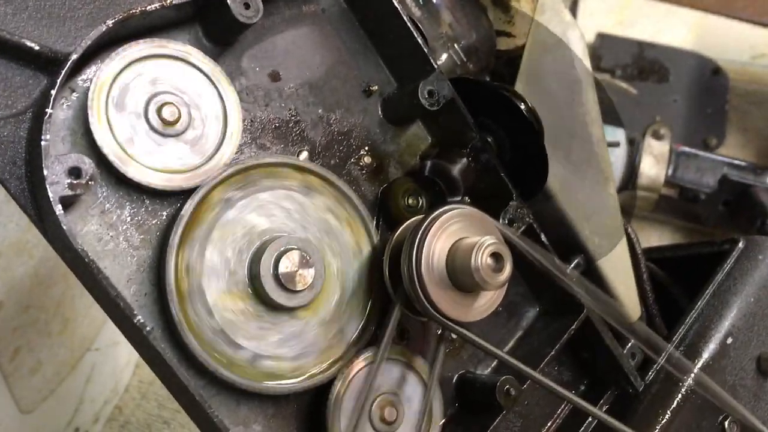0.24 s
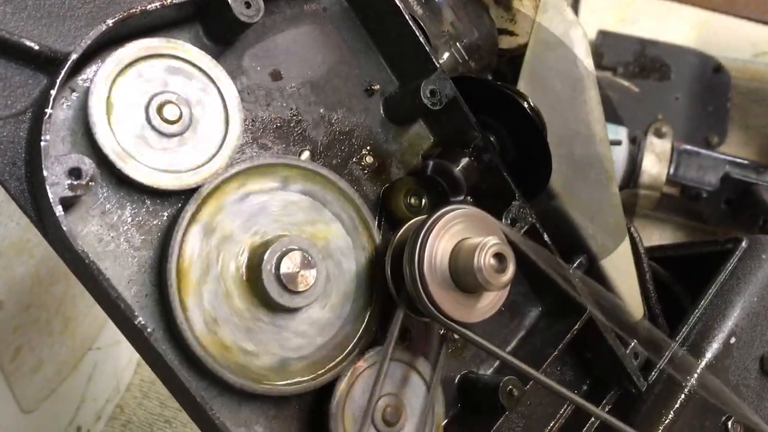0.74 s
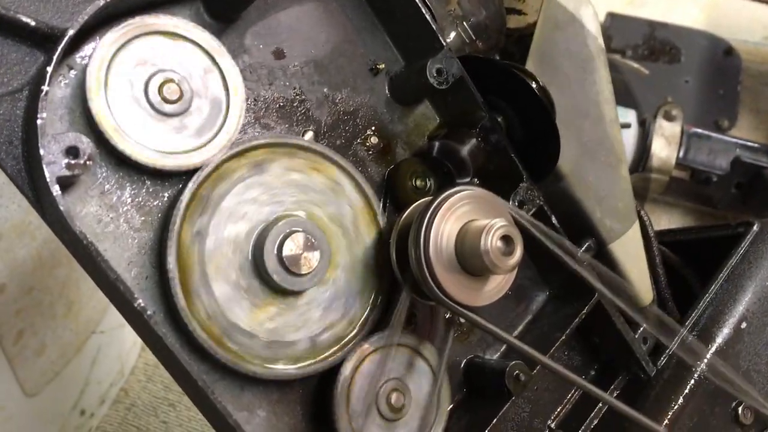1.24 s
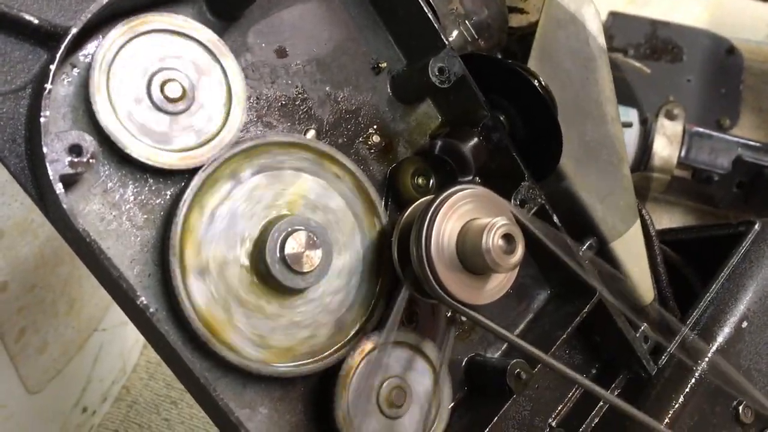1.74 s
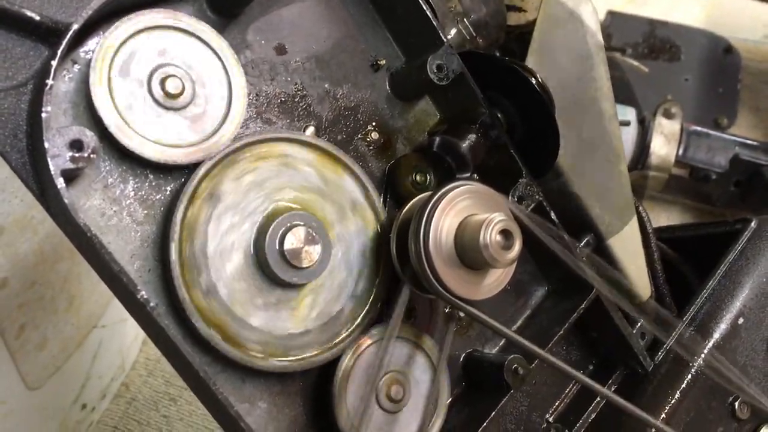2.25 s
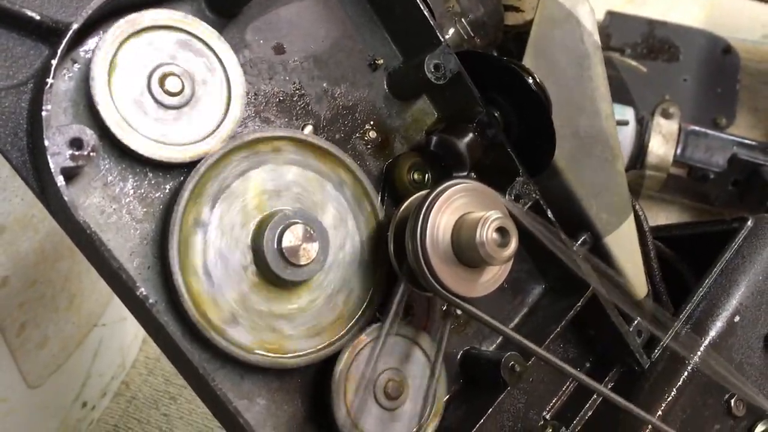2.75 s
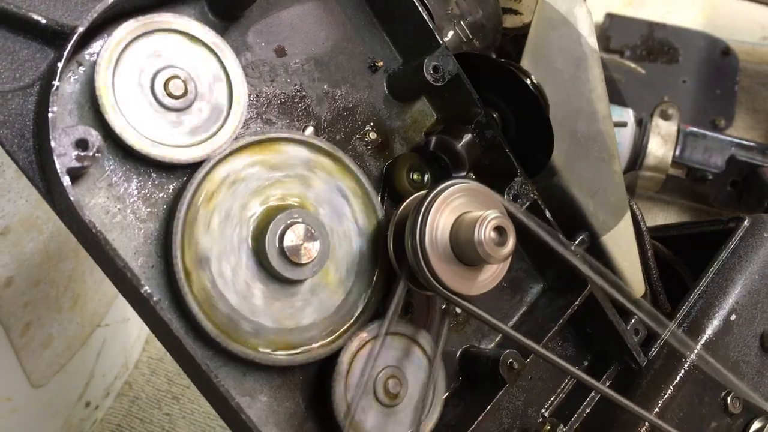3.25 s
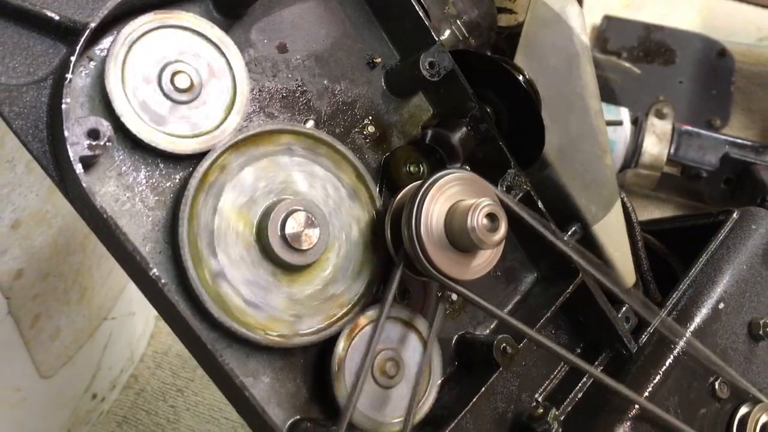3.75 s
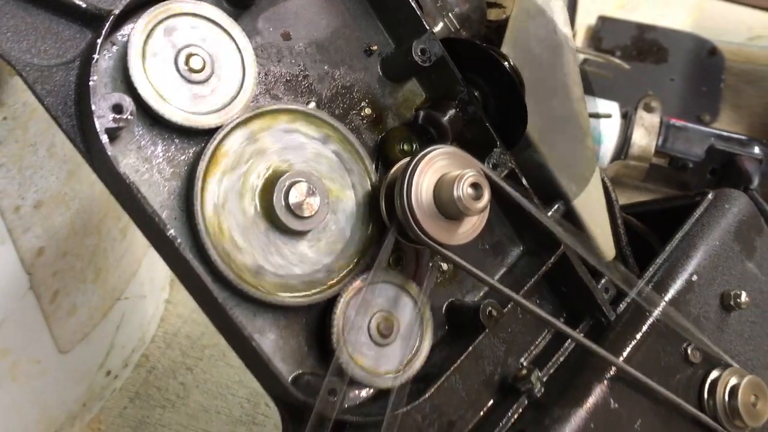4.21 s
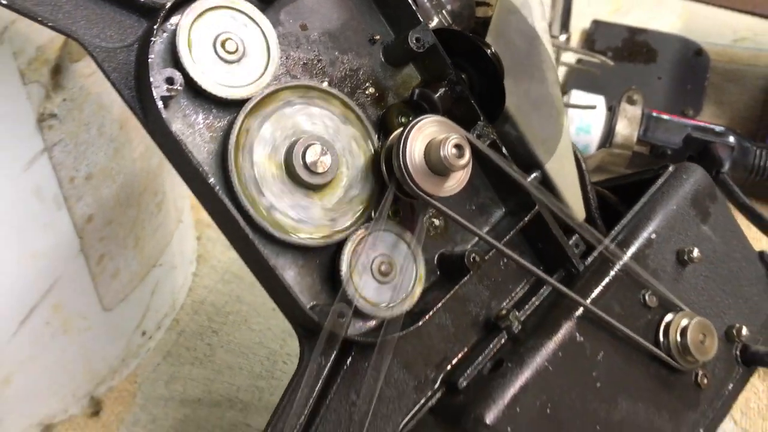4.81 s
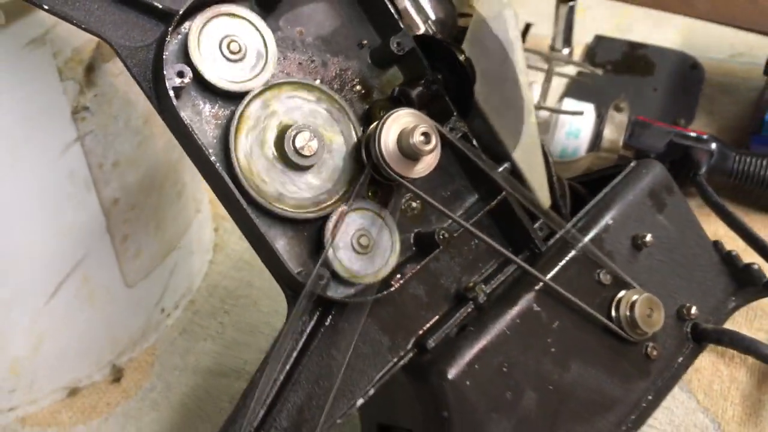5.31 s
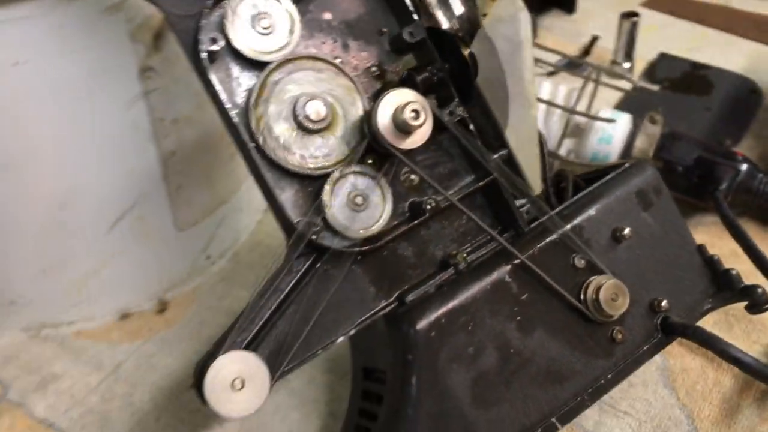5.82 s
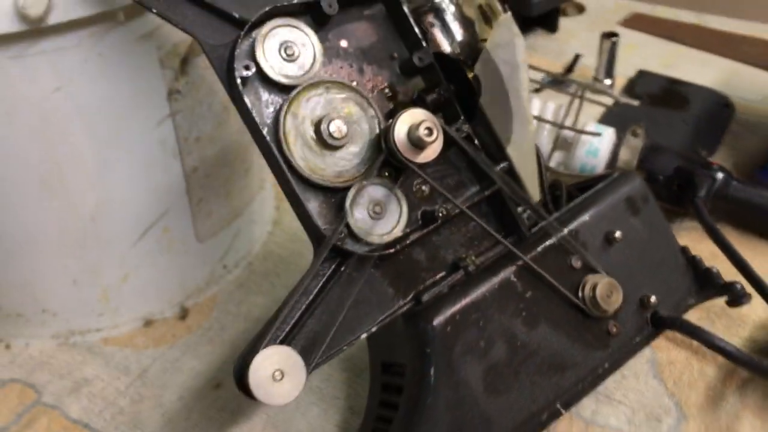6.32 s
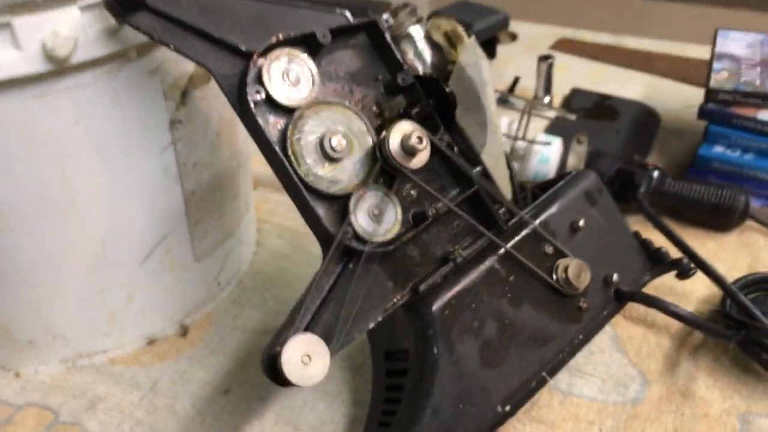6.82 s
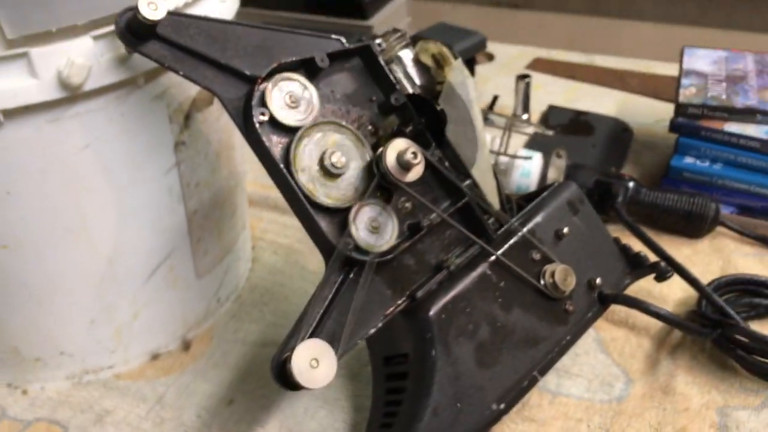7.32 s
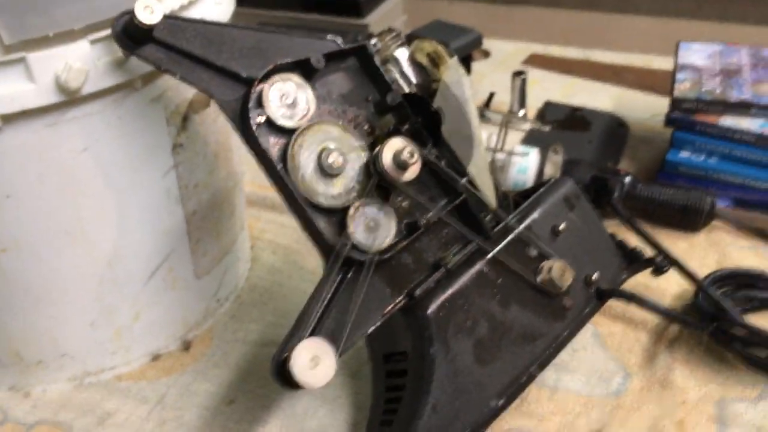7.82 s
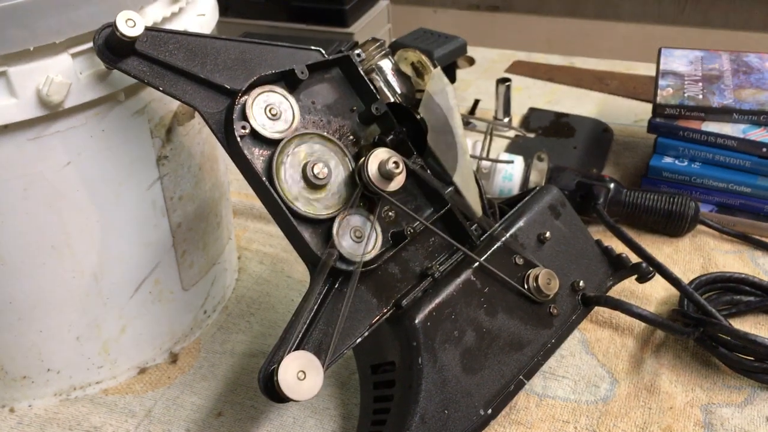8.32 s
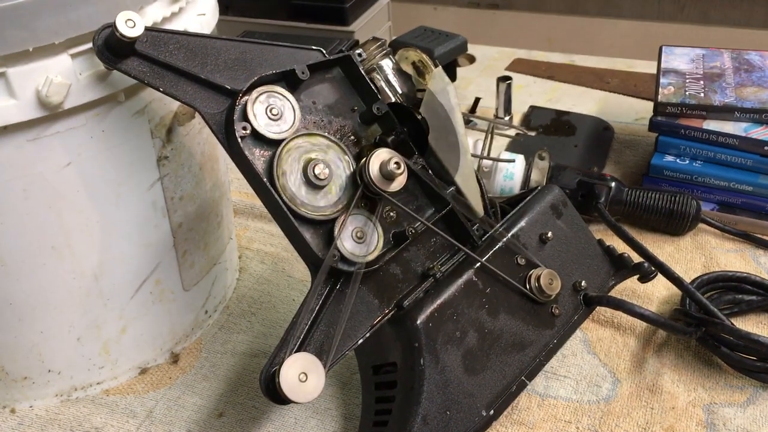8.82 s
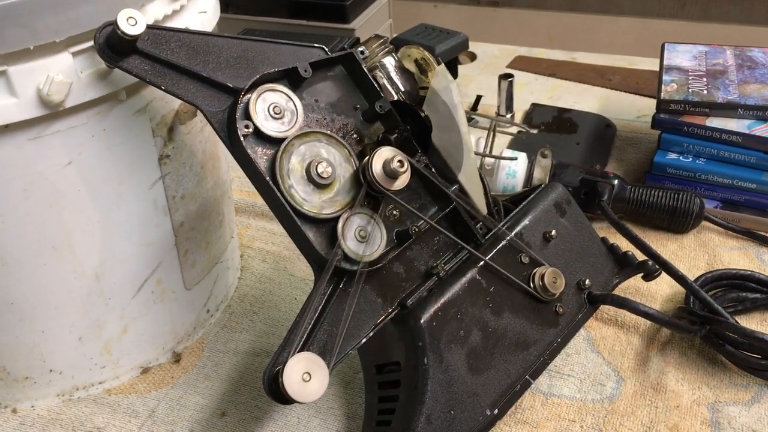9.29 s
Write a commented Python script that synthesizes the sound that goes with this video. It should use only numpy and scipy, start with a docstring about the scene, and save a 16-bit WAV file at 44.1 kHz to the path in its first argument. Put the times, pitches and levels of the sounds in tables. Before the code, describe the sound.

Rapid, even rattling of a running film projector's metal mechanism, with a humming motor and rumbling belts underneath.

```python
"""Film projector, cover off

An old projector runs while a hand-held microphone backs away from it. On each turn of the shutter
shaft, about 30 a second, claw and cam strike the same round of rattling blows that ring the metal
chassis. Under the clatter the belts rumble, the motor hums and a gear whines.
Late on, the hand bumps the microphone twice."""
import sys
import numpy as np
from scipy import signal
from scipy.fft import rfft, irfft, next_fast_len
from scipy.io import wavfile

SR = 44100
rng = np.random.default_rng(int(sys.argv[2]) if len(sys.argv) > 2 else 0)


def digitize_waveform(pressure):
    """Quantize a signal to 16-bit integers and store it at the path in sys.argv[1].

    Rows of a 2-D input are taken as channels; values are limited to [-1, 1].
    """
    field = np.atleast_2d(pressure).T
    bounded = np.clip(field, -1, 1)
    quanta = np.round(bounded * 32767).astype(np.int16)
    wavfile.write(sys.argv[1], SR, quanta)


N = 421149
TIME = np.arange(N) / SR

# shutter shaft speed, wavering as the belt slips: t/s, speed/(turns per s)
SHAFT_SPEED = [(0.0, 29.321), (0.38, 29.941), (2.66, 29.55), (3.1, 29.099), (3.54, 29.846), (3.86, 29.037),
               (4.03, 29.626), (4.86, 29.594), (6.03, 29.912), (6.44, 30.603), (6.99, 29.994),
               (7.38, 30.582), (7.66, 30.324), (9.14, 30.494), (9.55, 31.057)]
# the blows of one turn: shaft angle/turns, power decay before band damping/s, relative level/dB,
# brightness/(dB per band upwards), change from afar/dB
BLOWS = [(-0.345, 0.005, -3.5, -0.2, 2.0), (-0.315, 0.0013, 2.5, -0.6, -4), (-0.209, 0.00094, -1, 5, -4.3),
         (-0.046, 0.0021, 8.0, 0.9, -0.87), (0.038, 0.0015, 1, 1.6, 0), (0.166, 0.0012, 3.5, -1, 1.6),
         (0.212, 0.0011, 1.1, -3.5, -2.5), (0.418, 0.0018, -1.95, -2.3, 0), (0.47, 0.0022, -1, -2.5, 0.8)]
# bands of the clatter: low f/Hz, high f/Hz
BANDS = [(0, 2000), (2000, 5000), (5000, 8000), (8000, 22050)]
# steady rub of gears and bearings, per band: relative level/dB
RUB_DB = [-5.5, -15, -20, -25]
# per band: share of the rattle's power that repeats its pattern every turn
REPEAT_SHARE = [.75, .62, .5, .2]
# per band: factor on a blow's decay rate; the lows hang on longest
DAMPING = [.5, 1.35, 0.95, 1.25]
# ring of the metal chassis: f/Hz, half width/Hz, close gain/dB, far gain/dB
CHASSIS_MODES = [(1172, 140, -34, -35), (1508, 131, -21.5, -30), (1773, 124, -20, -19.5),
                 (2156, 131, -20.5, -22), (2478, 63, -18.5, -23.5), (2695, 184, -16.5, -19.5),
                 (3067, 132, -9, -19.3), (3234, 134, -26.5, -20), (3627, 220, -21, -20.8),
                 (4086, 230, -15.5, -20.5), (4390, 148, -10, -24), (4694, 169, -21.5, -23.5),
                 (5304, 243, -18, -21), (5690, 205, -17.5, -16.5), (6090, 215, -14, -16.5),
                 (6730, 390, -22.5, -27.5), (7450, 245, -17, -22.5), (7870, 286, -25, -42),
                 (8313, 320, -24, -25.5), (8910, 380, -26.5, -29), (9550, 349, -25.5, -25),
                 (10110, 280, -22, -25.4), (10940, 333, -24, -27.5), (11545, 310, -15, -19),
                 (11830, 380, -23.5, -25), (12760, 390, -16.5, -21), (13188, 328, -24, -26),
                 (14000, 450, -28, -28.5), (14875, 430, -27.2, -25.5), (15473, 413, -28, -27)]
# beams and shadows of the metal panels: middle t/s, half length/s, f/Hz, width/Hz, boost or cut/dB
PANEL_BEAMS = [(5.55, 1.45, 1790, 194, 4.5), (6.03, 0.53, 11670, 450, -8), (5.9, 0.7, 5190, 430, 3.0),
               (6.03, 0.5, 5930, 500, -4), (4.45, 0.99, 6350, 240, 2), (6.1, 0.8, 1130, 120, 5)]
# low body of housing and table: f/Hz, half width/Hz, close gain/dB, far gain/dB
HOUSING_MODES = [(62, 24, -33.5, -37), (90, 8, -34, -35), (135.5, 12.3, -22, -23.5),
                 (165.7, 14.5, -23.5, -28), (187, 13, -26, -31.5), (229.4, 16.5, -25.5, -30),
                 (286, 50, -32.5, -36), (358.5, 41, -29.5, -36), (425, 50, -37, -41), (578, 87, -38, -36.5),
                 (668, 54, -34.5, -36.5), (771, 60, -28.5, -32), (843, 33, -33, -35.5),
                 (1017, 136, -36, -39.5), (1156, 22, -39, -31)]
# hum of motor, pulleys and mains: f/Hz, dry close rms level/dB, waver/Hz
HUM_TONES = [(46.4, -61.5, .25), (59.3, -67, 0.28), (119.9, -59, 0.086), (239.8, -54, .15),
             (260, -68.5, .4)]
# the hand on the microphone: t/s, f/Hz, dry envelope peak/dB, time constant/s
HAND_BUMPS = [(7.70, 605, -47, 0.015), (7.84, 68, -41, .011)]


def gain_of(db):
    """Decibels to amplitude."""
    return 10 ** (np.asarray(db) / 20)


def unit_rms(x):
    """Scales to rms 1."""
    return x / np.sqrt(np.mean(x ** 2) + 1e-20)


def drift(per_s):
    """A random modulator of rms 1 that glides to a new value per_s times a second."""
    knots = np.random.default_rng(rng.integers(2 ** 31)).standard_normal(int(TIME[-1] * per_s) + 3)
    return unit_rms(np.interp(TIME * per_s, np.arange(len(knots)), knots))


def band(x, edges):
    """Brick-wall band-pass between two frequencies."""
    length = next_fast_len(N)
    hz = np.fft.rfftfreq(length, 1 / SR)
    return irfft(rfft(x, length) * ((hz >= edges[0]) & (hz < edges[1])), length)[:N]


def blow_hits(angle, start_turns=.469, uneven_db=.7, limp_db=.45, jitter_s=.00014, limp_s=.00014):
    """One spike of power a turn; play in the drive makes every other one early and strong."""
    turns = start_turns + np.cumsum(np.interp(TIME, *np.transpose(SHAFT_SPEED))) / SR
    turn = np.arange(int(turns[-1]) + 2)
    late, strong = rng.standard_normal((len(turn), 2)).T
    limp = (-1.) ** turn
    hit_s = np.interp(turn + angle, turns, TIME, left=-1, right=-1) + jitter_s * late - limp_s * limp
    heard = (hit_s > 0) & (hit_s < TIME[-1])
    hits = np.zeros(N)
    hits[(hit_s[heard] * SR).astype(int)] = gain_of(uneven_db * strong + limp_db * limp)[heard] ** 2
    return hits


def repeating_chatter(hits, size=1024):
    """The same parts meet the same way each turn, so every blow retriggers its own contact pattern."""
    last_hit = np.maximum.accumulate(np.arange(N) * hits.any(0))
    patterns = rng.choice([-1, 1], (len(hits), size))
    return patterns[hits.argmax(0)[last_hit], (np.arange(N) - last_hit) % size]


def whitened(x):
    """Gives x the flat average spectrum of white noise of rms 1."""
    hz, power = signal.welch(x, SR, nperseg=512, detrend=False)
    length = next_fast_len(N)
    colour = np.interp(np.fft.rfftfreq(length, 1 / SR), hz, np.sqrt(power * SR / 2))
    return irfft(rfft(x, length) / colour, length)[:N]


def ring(force, modes, far, size):
    """A driven body rings at its modes; its close colour crossfades into its far colour."""
    centre, width, close_db, far_db = np.transpose(modes)[:, :, None]
    hz = abs(np.fft.fftfreq(size, 1 / SR))
    out = np.zeros(N)
    for db, blend in ((close_db, 1 - far), (far_db, far)):
        power = (gain_of(db) ** 2 / (1 + ((hz - centre) / width) ** 2) ** 2).sum(0)
        # minimum phase: no ring ahead of the strike
        log_spectrum = signal.hilbert(np.log(power + 1e-12) / 2).conj()
        response = np.fft.ifft(np.exp(log_spectrum)).real
        out += blend * signal.oaconvolve(force, response[:size // 2])[:N]
    return out


def cross_beams(x):
    """Panels radiate unevenly: narrow bands swell or dip as the microphone crosses a beam or shadow."""
    for middle_s, half_s, hz, width_hz, db in PANEL_BEAMS:
        inside = np.exp(-((TIME - middle_s) / half_s) ** 4)
        resonance = signal.lfilter(*signal.iirpeak(hz, hz / width_hz, SR), x)
        x = x + (gain_of(db * inside) - 1) * resonance
    return x


def table_echo(x, far, close_s=.0015, extra_s=0.000894, strength=0.091):
    """The table top returns a weak copy; its lag grows with distance, so a faint comb glides."""
    return x + strength * np.interp(TIME - close_s - extra_s * far, TIME, x, left=0)


def clatter(far, far_rub_db=3.0, level_db=0.03):
    """Each blow of claw and cam is a burst of tiny metal contacts that rings the chassis."""
    angles, decays_s, levels_db, bright_db, far_db = np.transpose(BLOWS)
    bands_db = [levels_db + bright_db * step for step in np.arange(len(BANDS)) - (len(BANDS) - 1) / 2]
    hits = np.array([blow_hits(angle) for angle in angles])
    repeating = repeating_chatter(hits)
    loose = rng.choice([-1, 1], N) * unit_rms(gain_of(1.2 * drift(2500)))
    heard = hits * gain_of(far_db[:, None] * far) ** 2
    force = np.zeros(N)
    for edges, blows_db, rub_db, share, damping in zip(BANDS, bands_db, RUB_DB, REPEAT_SHARE, DAMPING):
        # instant attack and exponential tail on every hit
        power = sum(signal.lfilter([gain_of(db) ** 2], [1, -np.exp(-damping / (SR * decay_s))], train)
                    for db, decay_s, train in zip(blows_db, decays_s, heard))
        contacts = np.sqrt(share) * repeating + np.sqrt(1 - share) * loose
        force += band(contacts, edges) * np.sqrt(power)
        # a bed of rubbing; from afar the room fills the gaps between the blows
        force += band(rng.standard_normal(N), edges) * gain_of(rub_db + far_rub_db * far)
    metal = ring(whitened(force), CHASSIS_MODES, far, size=2048)  # the chassis sets the overall colour
    return gain_of(level_db) * table_echo(cross_beams(metal), far)


def belt_rumble(far):
    """Belts and rollers shake the housing at random."""
    return ring(rng.standard_normal(N), HOUSING_MODES, far, size=32768)


def tone(hz, db, waver_hz, flutter_db, flutters_per_s):
    """A sine whose pitch and level waver with the load."""
    cycles = np.cumsum(hz + waver_hz * drift(4)) / SR
    return gain_of(db + flutter_db * drift(flutters_per_s)) * np.sqrt(2) * np.sin(2 * np.pi * cycles)


def motor(far, far_db=-1.3):
    """The motor's hum and a thin gear whine, both a touch softer from afar."""
    hum = sum(tone(*row, flutter_db=.5, flutters_per_s=5) for row in HUM_TONES)
    whine = tone(hz=818, db=-57, waver_hz=1.0, flutter_db=1.0, flutters_per_s=16)
    return (hum + whine) * gain_of(far_db * far)


def hand_bumps():
    """The hand nudges the microphone: a soft knock, then a low thud, each a quick swell and decay."""
    out = np.zeros(N)
    for start_s, hz, db, decay_s in HAND_BUMPS:
        age = np.maximum(TIME - start_s, 0)
        envelope = age / decay_s * np.exp(1 - age / decay_s)
        out += gain_of(db) * envelope * np.sin(2 * np.pi * hz * age)
    return out


def scene(retreat_middle_s=5.14, retreat_length_s=3.8):
    """The mono mix, with one smooth pull-back from far = 0 (at the gears) to far = 1."""
    move = np.clip((TIME - retreat_middle_s) / retreat_length_s, -.5, .5)
    far = .5 + .5 * np.sin(np.pi * move)
    return (clatter(far) + belt_rumble(far) + motor(far) + hand_bumps())[None]


def record(dry, low_cut_hz=38, high_cut_hz=15850):
    """The microphone sheds the deepest bass; a steep high cut takes off the air."""
    thinned = signal.sosfilt(signal.butter(4, low_cut_hz, "highpass", fs=SR, output="sos"), dry)
    high_cut = signal.firwin(511, high_cut_hz, window=("kaiser", 9), fs=SR)
    return signal.oaconvolve(thinned, high_cut[None], "same")


dry = scene()
out = record(dry)
digitize_waveform(out)
```